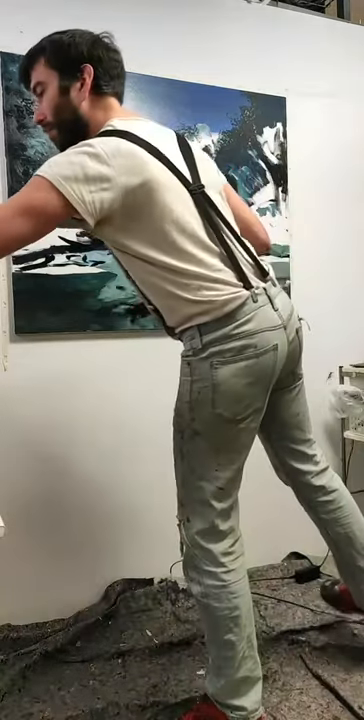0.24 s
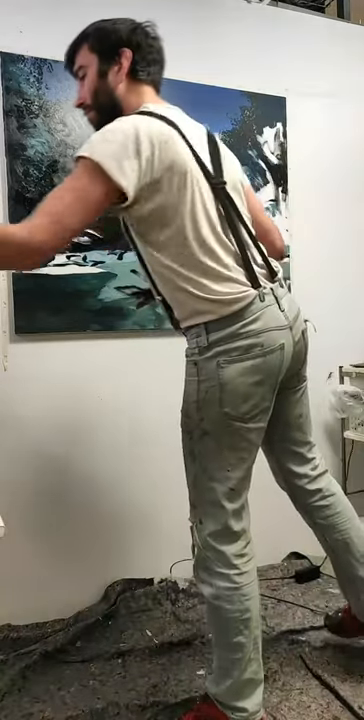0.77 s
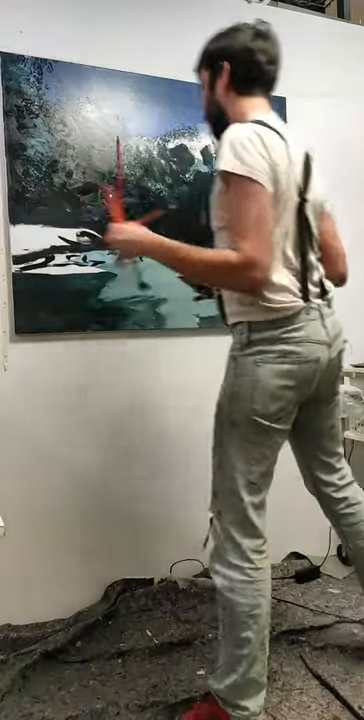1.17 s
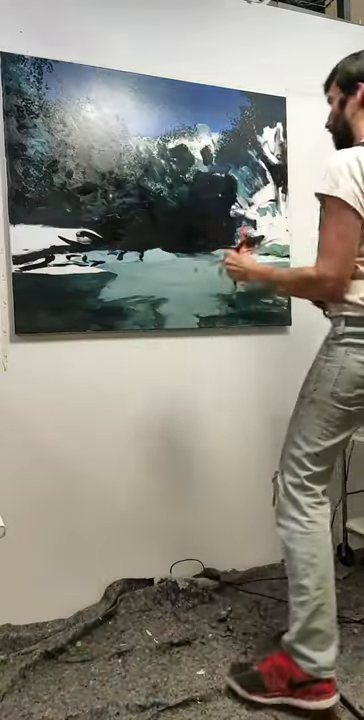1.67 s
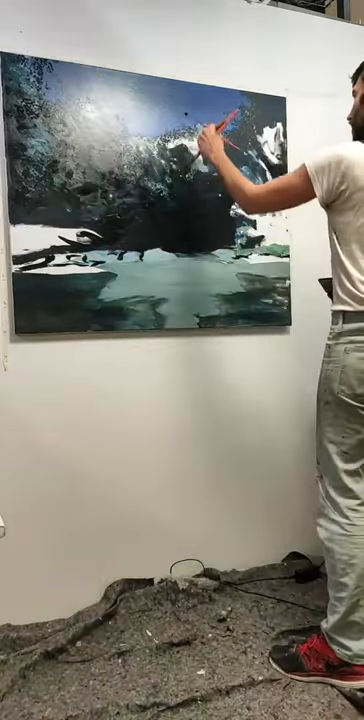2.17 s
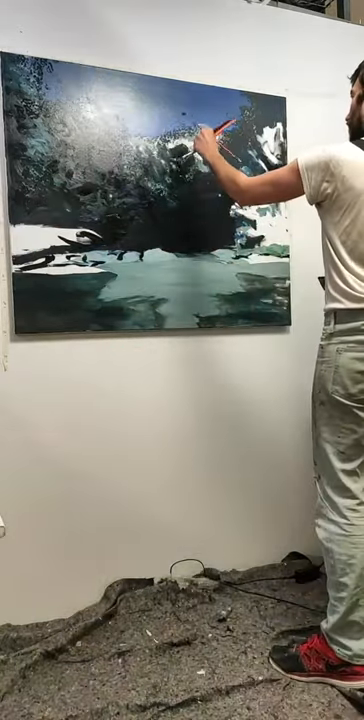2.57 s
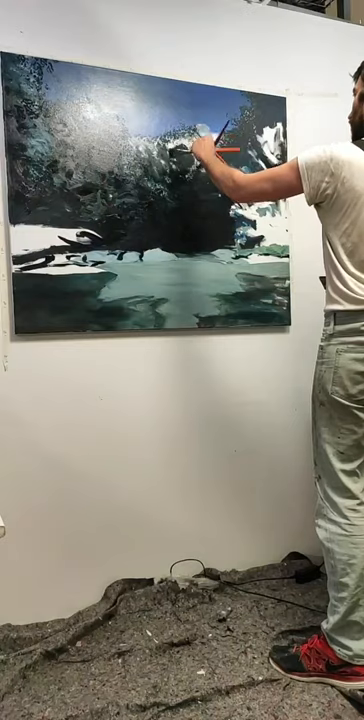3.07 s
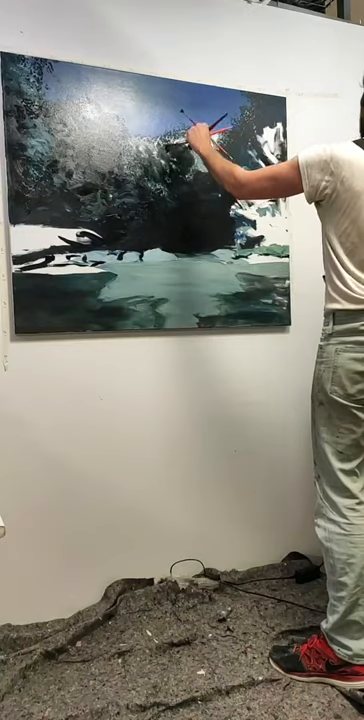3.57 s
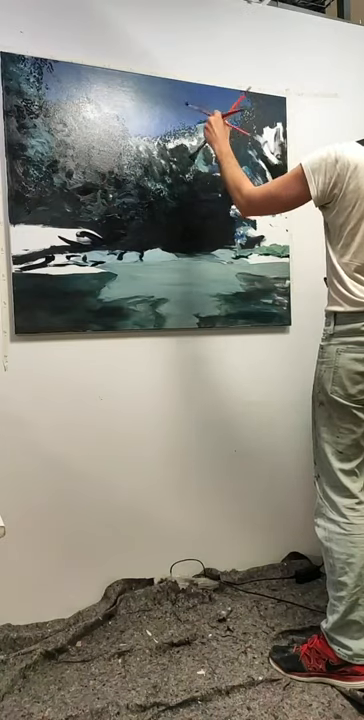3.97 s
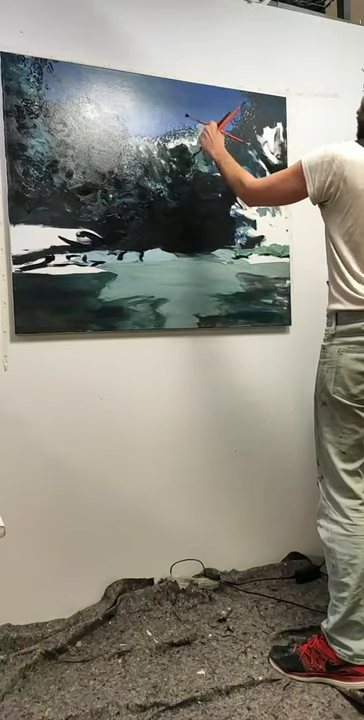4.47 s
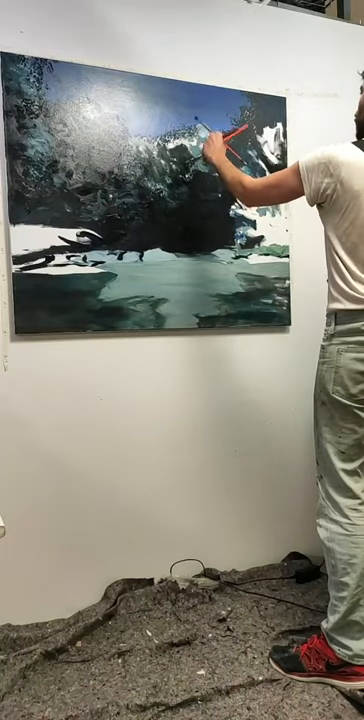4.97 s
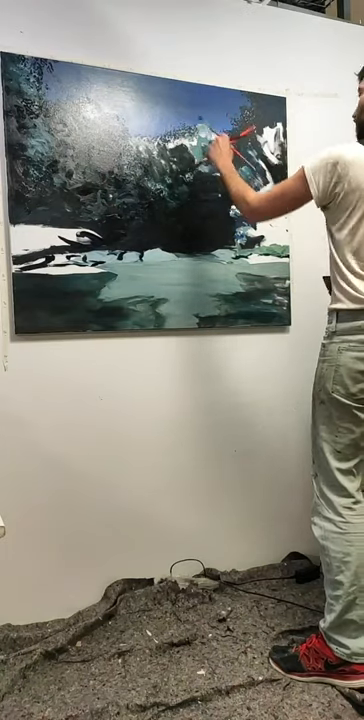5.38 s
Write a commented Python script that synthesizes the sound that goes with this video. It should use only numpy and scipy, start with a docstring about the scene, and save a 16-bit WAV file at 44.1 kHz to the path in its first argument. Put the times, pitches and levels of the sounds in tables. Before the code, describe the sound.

In a bare studio with a steady low hum, someone shifts their feet with small ticks and a short, squeaky shoe scuff. Wooden brush handles knock together amid a soft rustle of clothing. Then come two bursts of short, dry brush strokes on a taut canvas, each growing louder, with a light hollow drumming underneath. A faint creak and a rustle of fabric follow the last stroke.

```python
"""Painter in a bare studio

A painter shifts his feet: a rubber sole scuffs and squeaks, clothes rustle, wooden brush handles
clack in his hand. Then a bristle brush lands on a stretched canvas and scrubs it in two runs of
quick strokes. The canvas drums and sways under the brush, and a faint creak follows as he draws
back. A low hum fills the room."""
import sys
import numpy as np
from scipy import signal
from scipy.fft import rfft, irfft, next_fast_len
from scipy.io import wavfile
from scipy.ndimage import uniform_filter1d

SR = 44100
rng = np.random.default_rng(int(sys.argv[2]) if len(sys.argv) > 2 else 0)


def dump(signal):
    """Clip the signal to [-1, 1] and save it as 16-bit WAV at the path in sys.argv[1]."""
    limited = np.clip(np.atleast_2d(signal).T, -1, 1)
    pcm = np.round(limited * 32767).astype(np.int16)
    wavfile.write(sys.argv[1], SR, pcm)


N = 248724
T = np.arange(N) / SR


def amp(db):
    """Decibels to gain."""
    return 10 ** (np.asarray(db) / 20)


def unit(x):
    """Scales to rms 1."""
    return x / np.sqrt(np.mean(x ** 2) + 1e-20)


def curve_at(points, hz):
    """Reads a curve of (Hz, value) points on a log-frequency axis."""
    f, value = np.transpose(points)
    return np.interp(np.log(hz + 1), np.log(f + 1), value)


def colour(x, spectrum):
    """Shapes x with an EQ curve of (Hz, dB) points, at rms 1."""
    gain = amp(curve_at(spectrum, np.fft.rfftfreq(len(x), 1 / SR)))
    return unit(irfft(rfft(x) * gain, len(x)))


def drift(hz):
    """Smooth random motion up to about hz, rms 1."""
    size = next_fast_len(N, real=True)
    smooth = np.exp(-(np.fft.rfftfreq(size, 1 / SR) / hz) ** 2)
    return unit(irfft(rfft(rng.standard_normal(size)) * smooth, size)[:N])


def tone(hz):
    """A sine whose pitch follows the curve hz."""
    return np.sin(2 * np.pi * np.cumsum(hz) / SR)


def swell(start_s, rise_s, t60, hold_s=0):
    """An envelope: smooth rise, hold and exponential fade."""
    t = T - start_s
    attack = np.sin(np.pi / 2 * np.clip(t / rise_s, 0, 1)) ** 2
    return attack * amp(-60 * np.maximum(t - rise_s - hold_s, 0) / t60)


def grains(per_s, spread_db):
    """Tiny random snaps of uneven size, rms 1."""
    snaps = (rng.random(N) < per_s / SR) * rng.standard_normal(N)
    return unit(snaps * amp(spread_db * np.minimum(rng.exponential(1, N), 4)))


def ring(modes):
    """Modes (Hz, dB, t60 in seconds) ring out after one blow."""
    t = T[:SR // 2]
    return sum(amp(db - 60 * t / t60) * np.sin(2 * np.pi * hz * t) for hz, db, t60 in modes)


def burst(spectrum, t60):
    """A knock into many close, quickly damped modes with the given spectrum."""
    t = T[:SR // 4]
    return colour(rng.choice([-1., 1.], len(t)), spectrum) * amp(-60 * t / t60)


def resonate(x, hz, width_hz):
    """A resonance whose centre follows the curve hz."""
    turn = np.exp(2j * np.pi * np.cumsum(hz) / SR)
    pole = np.exp(-np.pi * width_hz / SR)
    return 2 * (turn * signal.lfilter([1 - pole], [1, -pole], x / turn)).real


def add_hit(mix, start_s, db, hit):
    """Places a hit whose first 5 ms have the level db."""
    part = mix[round(start_s * SR):][:len(hit)]
    part += amp(db) * hit[:len(part)] / np.std(hit[:SR // 200])


# The studio's reverb decay. Each row: frequency in Hz, t60 in seconds.
STUDIO_DECAY = [(200, 0.32), (1000, 0.43), (4000, 0.31), (8000, 0.27), (14000, 0.25)]


def studio(dry, wet_db, paths=3):
    """Bare walls return a dense tail, each band dying at its own speed; the echoes shift as he moves."""
    wet = np.zeros(N)
    for k in range(paths):
        echoes = rng.standard_normal(SR // 2) * (rng.random(SR // 2) < .15)
        echoes *= T[:SR // 2] > .004  # pre-delay
        hz, t, bands = signal.stft(echoes, SR, nperseg=256)
        decay = amp(-60 * t / curve_at(STUDIO_DECAY, hz)[:, None])
        tail = signal.istft(bands * decay, SR, nperseg=256)[1]
        send = np.sqrt(2 / paths) * np.cos(np.pi * (3 * T + k / paths))  # crossfades the tails
        wet += signal.oaconvolve(dry * send, tail / np.linalg.norm(tail))[:N]
    return (dry + amp(wet_db) * wet) / np.hypot(1, amp(wet_db))


# The colour of the room tone. Each row: frequency in Hz, relative level in dB.
ROOM_TONE_EQ = [(15, -2.5), (32, -8.5), (44, -4.5), (64, -9.5), (120, -17.5), (170, -18), (230, -24.5),
                (340, -25.5), (420, -27), (680, -32.5), (880, -30.5), (2200, -43), (9000, -56.5),
                (13600, -52)]


def room_tone(above_170_hz_db=-60.5):
    """A steady, dark bed of air, its level set by the part above the rumble."""
    air = colour(rng.standard_normal(N), ROOM_TONE_EQ)
    upper = signal.sosfilt(signal.butter(4, 170, "high", fs=SR, output="sos"), air)
    return amp(above_170_hz_db) * air / np.std(upper)


# The partials of the low hum. Each row: pitch in Hz, wander in Hz, relative level in dB.
HUM_PARTIALS = [(57.1, 1.407, -48.5), (65.14, 3.23, -56), (90.7, 3, -60.5), (111.8, 3.33, -63),
                (197.3, 2.1, -69.5), (293.8, 3.13, -72.5), (345.5, 2.98, -82)]


def hum(rise_db_per_s=0.34, drone_hz=149.6, drone_rise_db_per_s=2):
    """A wavering low hum and a higher drone both grow slowly; the drone surges once and settles."""
    low = np.zeros(N)
    for hz, wander_hz, db in HUM_PARTIALS:
        gain = amp(db + 0.67 * drift(2.6))
        cycles = np.cumsum(hz + wander_hz * drift(5.68)) / SR + rng.random()
        low += gain * np.sin(2 * np.pi * cycles)
    surge = amp(-60.5) * swell(start_s=3.28, rise_s=0.14, t60=2.5)
    drone = (amp(-72.5 + drone_rise_db_per_s * T) + surge) * tone(drone_hz + 0.46 * drift(2.8))
    return np.sqrt(2) * (amp(-2 + rise_db_per_s * T) * low + drone)


# The colour of rubbing fabric. Each row: frequency in Hz, relative level in dB.
CLOTH_EQ = [(300, -7.5), (800, -2), (1400, -8.5), (2500, -8.5), (4000, -4.5), (7000, -6), (13600, -9.5)]
# Folds brushing past. Each row: peak time in seconds, rise in seconds, t60 in seconds, level in dB.
FOLD_RUBS = [(.24, 0.026, 0.59, -66), (1.033, 0.013, .4, -54.5), (1.355, 0.06, 0.26, -51),
             (1.63, 0.055, 0.84, -58), (1.745, 0.083, .25, -48.5), (1.825, 0.033, 0.53, -63.5),
             (3.93, 0.028, .2, -72), (4.025, 0.016, .15, -73), (5.385, 0.18, 0.41, -61),
             (5.531, 0.016, .3, -58)]


def clothes(sag_db_per_s=6, stands_s=2.7, settle_t60=1.5):
    """Fabric rubs in fine grains: single folds over a faint shuffle that dies as he stands still."""
    settle = amp(-60 * np.maximum(T - stands_s, 0) / settle_t60)
    shuffle = amp(-66 - sag_db_per_s * T) * settle
    fold_power = sum((amp(db) * swell(peak - rise, rise, t60)) ** 2 for peak, rise, t60, db in FOLD_RUBS)
    return np.sqrt(shuffle ** 2 + fold_power) * colour(grains(per_s=9000, spread_db=-1), CLOTH_EQ)


def creak(start_s=5.388, length_s=0.073, pitch_hz=2200, width_hz=380, db=-67):
    """A faint creak as he draws back: a short, rough rub through one steep resonance."""
    load = np.sin(np.pi * np.clip((T - start_s) / length_s, 0, 1))
    hz = np.full(N, pitch_hz)
    rub = resonate(grains(per_s=3100, spread_db=-1), hz, width_hz)
    return amp(db) * load * unit(resonate(rub, hz, width_hz))


# Small dry ticks as he moves. Each row: start in seconds, level in dB.
DRY_TICKS = [(.106, -46), (0.3166, -43), (1.824, -51)]
# The colour of a tick. Each row: frequency in Hz, relative level in dB.
TICK_EQ = [(350, -21), (800, 2), (1400, 5.5), (2000, -3), (2700, 1), (3400, -2.5), (4500, -17),
           (13600, -26)]
# Soft low thuds and booms. Each row: start in seconds, level in dB, pitch in Hz, length in seconds.
LOW_THUDS = [(0.124, -56, 330, 0.071), (0.482, -41, 53.3, 0.096), (1.171, -51, 236.7, 0.07),
             (2.76, -41.5, 58.33, 0.34), (3.46, -51, 57.9, 0.2)]


def ticks_and_thuds(tick_t60=0.033):
    """Dry ticks and soft low thuds, then brief booms at the hum's pitch during the scrubbing."""
    out = np.zeros(N)
    for start, db in DRY_TICKS:
        add_hit(out, start, db, burst(TICK_EQ, tick_t60))
    for start, db, hz, length in LOW_THUDS:
        envelope = np.sin(np.pi * np.clip((T - start) / length, 0, 1))
        out += amp(db) * envelope * unit(tone(hz * (1 + 0.213 * drift(hz / 2))))
    return out


# Low room resonances set ringing by the scuff. Each row: pitch in Hz, relative level in dB,
# t60 in seconds.
ROOM_MODES = [(207.4, 2, 0.13), (266, -5, 0.14), (301.4, 0, 0.16), (344, 1.5, 0.11), (359.3, -5.5, 0.21),
              (436, -5.5, 0.11), (492, -3.5, 0.092), (533, -14, 0.059)]
# The colour of grit under the sole. Each row: frequency in Hz, relative level in dB.
GRIT_EQ = [(300, -1), (600, 3.5), (850, 5.5), (1100, -2), (1400, -3), (1750, -0.5), (2000, -3), (2400, -2),
           (2950, -1), (4000, -10.5), (7400, -10.5), (13600, -18)]


def scuff(start_s=.311, bite_s=0.025, slide_s=0.043, t60=0.14, slips_hz=420, squeak_db=-16):
    """Rubber sticks and slips: its judder sinks as it slows, while it grinds grit and squeaks upward."""
    slid_s = np.clip(T - start_s, 0, bite_s + slide_s + t60 / 10)
    judder_hz = 440 - 760 * slid_s
    squeak_hz = 1010 + 2300 * slid_s
    pressure = amp(-31.5) * swell(start_s, bite_s, t60, slide_s)
    grinding = amp(-37) * swell(start_s=0.2985, rise_s=0.053, t60=0.21)
    slip_count = np.cumsum(slips_hz * np.exp(.8 * drift(300))) / SR
    slips = np.diff(np.floor(slip_count), prepend=0) * amp(3.8 * drift(200))  # one uneven click a slip
    slips = unit(slips - uniform_filter1d(slips, size=300))
    judder = resonate(signal.fftconvolve(slips, ring(ROOM_MODES))[:N], judder_hz, width_hz=150)
    judder /= np.sqrt(abs(uniform_filter1d(judder ** 2, size=700)) + 1e-12)  # friction caps the swing
    squeak = unit(tone(squeak_hz * (1 + 0.0206 * drift(180))))
    grit = colour(.5 * slips + grains(per_s=4900, spread_db=1.5), GRIT_EQ)
    return pressure * (judder + amp(squeak_db) * squeak) + grinding * grit


# The resonances of the wooden handles. Each row: pitch in Hz, spread in Hz, t60 in seconds,
# relative level in dB when struck at the tip, and when struck in the middle.
HANDLE_MODES = [(1260, 270, 0.026, -19.5, -11), (1980, 470, 0.033, -16.5, -10.5),
                (2700, 130, .02, -11, -18), (3360, 130, 0.075, -5.5, 6.5), (3740, 164, .03, -6, -9),
                (4780, 270, .13, -3.5, -4), (5070, 180, .15, 2, -8), (5196, 156, 0.64, -7, -19),
                (5820, 266, .05, 0.5, -37.5), (6303, 130, .03, -2.5, -22), (6900, 270, .11, -6, -9.5),
                (7400, 200, .09, -3, -25), (8535, 660, 0.0395, -6, -18), (9500, 330, 0.15, 0.5, -28),
                (10443, 600, .02, -12, -22), (11770, 550, .02, -11, -26.5), (13280, 450, 0.028, -9, -40)]
# Handles knocking together. Each row: start in seconds, level of the direct knock in dB,
# strike point from 0 (tip) to 1 (middle).
HANDLE_CLACKS = [(1.029, -68, 0), (1.0946, -29, 0.12), (1.5015, -40, 0.99), (1.555, -47.5, 0.31)]


def handles(wall_s=.0039, wall_db=6.5, crack_t60=0.037, rattle_t60=0.16, rattle_db=-9, ring_db=-21):
    """Wood knocks on wood: a crack, a short rattle, a faint ring; a near wall slaps each crack back."""
    out, t, f = np.zeros(N), T[:SR // 4], np.arange(0, SR / 2, 20)
    hz, spread, t60, tip_db, middle_db = np.transpose(HANDLE_MODES)
    ring_attack = 1 - np.exp(-t / 0.00095)
    for start, db, strike_point in HANDLE_CLACKS:
        mode_db = tip_db + strike_point * (middle_db - tip_db)
        mode_power = amp(mode_db) ** 2 / (1 + ((f[:, None] - hz) / spread) ** 2 / 2) ** 3
        spectrum = np.c_[f, 10 * np.log10(mode_power.sum(1))]
        ringing = ring(zip(hz, mode_db, t60))[:len(t)] * ring_attack
        tail = amp(rattle_db) * burst(spectrum, rattle_t60) + amp(ring_db) * ringing
        add_hit(out, start, db, burst(spectrum, crack_t60) + tail)
        add_hit(out, start + wall_s, db + wall_db, burst(spectrum, crack_t60))
    return out


# The brush leaning into the canvas. Each row: start in seconds, level in dB.
CANVAS_PUSHES = [(2.24, -31), (2.67, -28), (3.12, -33.5), (3.36, -38.5), (3.98, -47), (4.37, -34),
                 (4.7, -37.5)]


def canvas_sway(flap_hz=11, wander_hz=0.89, flutter_hz=30, flutter_db=-16):
    """The pushed canvas flaps at its lowest mode, with a weaker flutter above it."""
    flap = unit(tone(flap_hz + wander_hz * drift(4.3)))
    flutter = unit(drift(33) * np.sin(2 * np.pi * flutter_hz * T))
    power = sum((amp(db) * swell(start, rise_s=0.16, t60=1)) ** 2 for start, db in CANVAS_PUSHES)
    return np.sqrt(power) * (flap + amp(flutter_db) * flutter)


# The drum tones of the painted canvas. Each row: pitch in Hz, relative level in dB, t60 in seconds.
CANVAS_MODES = [(541.6, -2, 0.12), (578, 0, 0.056), (638, 0, 0.048), (683, 1, 0.074), (783.6, -8, 0.13),
                (851.2, -5.5, 0.05), (1040, -13, 0.027), (1173, -11.5, 0.32)]
# The colour of the bristle scrape. Each row: frequency in Hz, relative level in dB.
BRISTLE_EQ = [(300, -26), (600, -23), (1100, -3), (1600, -4), (2500, -6), (4300, -2), (5600, -4.5),
              (6700, -0.5), (7300, -3.5), (8400, -1.5), (9600, -4.5), (12400, -6.5), (13500, -6.5)]
# The brush tapping down on the canvas. Each row: start in seconds, level in dB.
BRUSH_LANDINGS = [(2.27, -46.5), (2.583, -46.5), (4.401, -52.5), (4.605, -47.5)]
# The scrubbing. Each row: start in seconds, length in seconds, bristle level in dB, drum level in dB.
BRUSH_STROKES = [(2.23, 0.19, -60, -62.5), (2.557, .16, -56.5, -58), (2.721, 0.081, -58, -65),
                 (2.823, .068, -47, -54.5), (2.928, 0.083, -52.5, -57.5), (3.036, .082, -49, -58),
                 (3.139, 0.069, -46, -55.5), (3.232, 0.078, -44.5, -49.5), (3.311, 0.075, -44, -53.5),
                 (4.417, 0.16, -53.5, -56.5), (4.577, 0.094, -50.5, -55), (4.666, .075, -42, -48),
                 (4.773, 0.094, -44, -52), (4.878, 0.071, -44, -55.5), (4.964, 0.12, -45, -54.5)]


def brush(fastest_share=.47, landing_s=0.00056, low_cut_hz=520):
    """Bristles flick over the weave, louder as the stroke speeds up; the same snaps drum the canvas."""
    out, drum_gain = np.zeros(N), np.zeros(N)
    snaps = grains(per_s=9000, spread_db=1) * amp(0.43 * drift(90))
    hz = np.linspace(300, 13800, num=50)
    for start, length, bristle_db, drum_db in BRUSH_STROKES:
        progress = np.interp((T - start) / length, [0, fastest_share, 1], [0, .5, 1])
        speed = np.sin(np.pi * progress).clip(0)
        drum_gain += amp(drum_db) * speed ** 1.2
        # each stroke's scrape has a slightly different colour
        colour_shift_db = 1.5 * rng.standard_normal(len(hz))
        span = slice(round(start * SR), round(start * SR) + SR // 4)
        scrape = colour(snaps[span], np.c_[hz, curve_at(BRISTLE_EQ, hz) + colour_shift_db])
        out[span] += amp(bristle_db) * speed[span] ** 1.5 * scrape
    # the open-backed canvas radiates little below its first strong modes
    low_cut = signal.butter(3, low_cut_hz, "high", fs=SR, output="sos")
    canvas = signal.sosfilt(low_cut, ring(CANVAS_MODES))
    out += drum_gain * unit(signal.fftconvolve(snaps, canvas)[:N])
    cushion = 1 - np.exp(-(T[:len(canvas)] / landing_s) ** 2)  # the bristles bend as they land
    for start, db in BRUSH_LANDINGS:
        add_hit(out, start, db, canvas * cushion)
    return out


def scene():
    """The mono mix: brush and movement in the studio's reverb, over dry sway, room tone and hum."""
    painting = studio(brush(), wet_db=-3) + canvas_sway()
    moving = studio(handles(), wet_db=-3) + studio(scuff(), wet_db=-9.5)
    small_sounds = studio(ticks_and_thuds() + clothes() + creak(), wet_db=-6)
    return (painting + moving + small_sounds + room_tone() + hum())[None]


def record(dry):
    """The recorder's band limit: a steep high cut."""
    high_cut = signal.firwin(511, cutoff=13950, window=("kaiser", 9), fs=SR)
    return signal.oaconvolve(dry, high_cut[None], "same")


dry = scene()
out = record(dry)
dump(out)
```